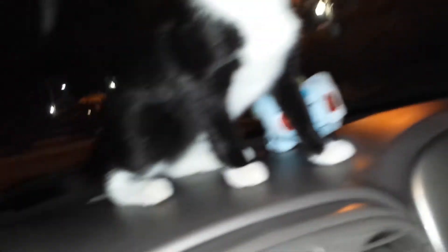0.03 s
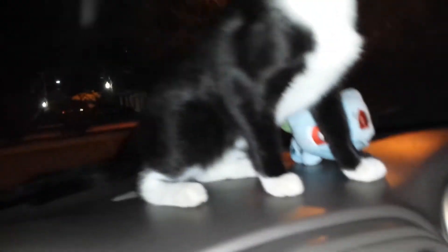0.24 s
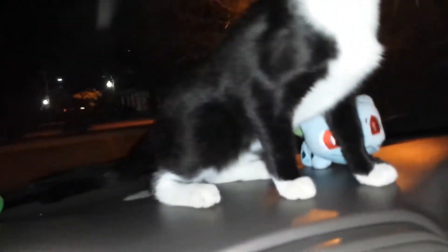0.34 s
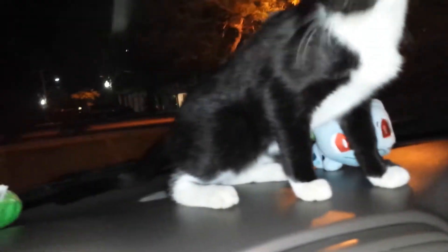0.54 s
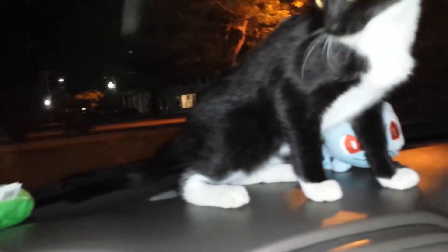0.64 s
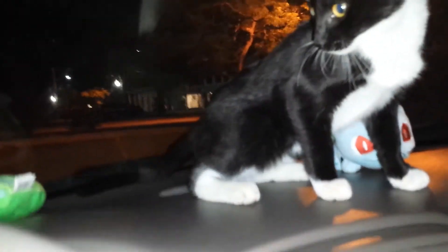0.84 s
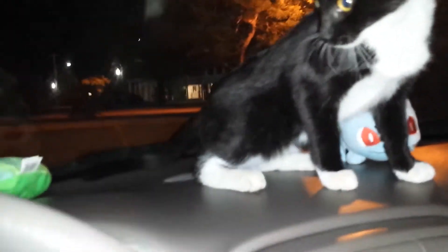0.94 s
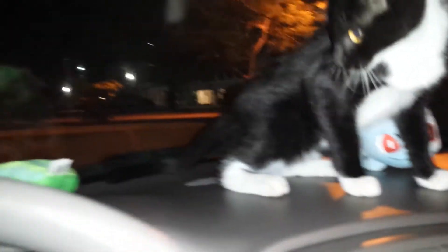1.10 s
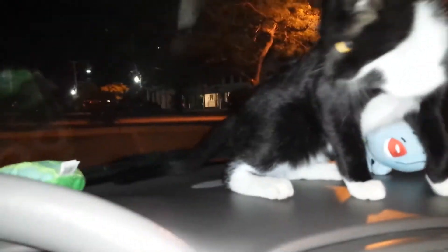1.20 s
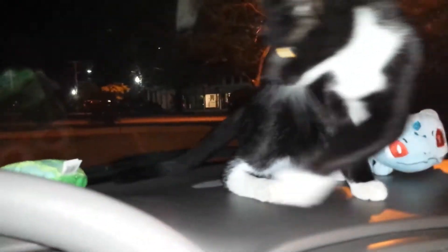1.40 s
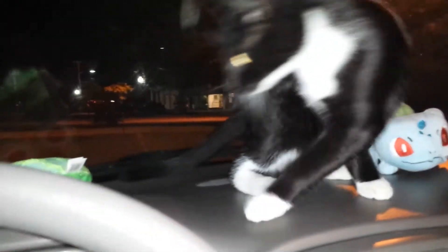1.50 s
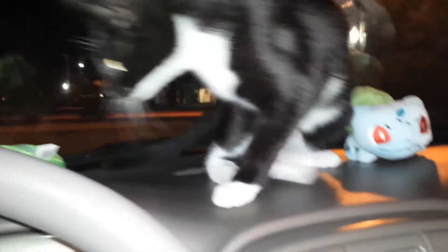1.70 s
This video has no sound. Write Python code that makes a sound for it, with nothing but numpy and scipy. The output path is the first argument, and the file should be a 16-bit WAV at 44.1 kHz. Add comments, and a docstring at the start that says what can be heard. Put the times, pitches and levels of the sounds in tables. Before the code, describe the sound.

Quick soft paw thumps and a brushing scuff on a plastic dashboard, over low cabin rumble.

```python
"""Quick soft pats, by paw or hand, on the plastic dashboard of a parked car.
From the start, low cabin rumble and microphone hiss lie under a faint rustle of fur. A brushing scuff
leads at 0.25 s into the pats, about seven a second: each slaps the plastic skin and excites the modes
of the hollow dashboard, and the cabin rings on briefly. Small ticks come just after 1 s.
The last pat lands near 1.45 s; a faint rustle, a scuff and a light touch follow."""
import sys
import numpy as np
from scipy import signal
from scipy.fft import rfft, irfft
from scipy.io import wavfile
from scipy.ndimage import uniform_filter1d

SR = 44100
rng = np.random.default_rng(int(sys.argv[2]) if len(sys.argv) > 2 else 0)


def to_wav(s):
    """Save 16-bit WAV."""
    ch = np.atleast_2d(s).T  # columns
    pcm = np.round(np.clip(ch, -1, 1) * 32767)  # PCM
    wavfile.write(sys.argv[1], SR, pcm.astype(np.int16))


N = 77175
TIME_S, FREQ_HZ = np.arange(N) / SR, np.fft.rfftfreq(N, 1 / SR)
RIGHT_LEAD_S = 0.00032  # the right microphone is nearer

def amp(db):
    """Amplitude ratio of a level in decibels."""
    return 10 ** (np.asarray(db) / 20)

def unit(x):
    """Normalisation to rms 1."""
    return x / np.sqrt(np.mean(x ** 2) + 1e-20)

def curve(points):
    """Interpolation of a spectrum over log frequency."""
    hz, db = np.transpose(points)
    return np.interp(np.log(FREQ_HZ + 1), np.log(hz + 1), db)

def pan(side_db):
    """Channel gains for a level difference, left minus right."""
    return amp(np.array([[.5], [-.5]]) * side_db)

def since(start_s):
    """Elapsed seconds, zero before the onset."""
    return np.maximum(TIME_S - start_s, 0)

def decay(t, t60_s):
    """Exponential damping: 60 dB in t60_s."""
    return np.exp(-np.log(1000) * t / t60_s)

def resonance(hz, width_hz):
    """Lorentzian peak of height 1."""
    return 1 / (1 + (2 * (FREQ_HZ - hz) / width_hz) ** 2)

def colour(x, spectrum, balance=None):
    """Spectral shaping that conserves the power of white noise."""
    gain = amp(curve(spectrum)) * (1 if balance is None else pan(curve(balance)))
    return irfft(rfft(x) * unit(gain), N)

def grit(grain, shared_power=0.15):
    """Friction noise in sub-millisecond clumps, partly coherent between the microphones."""
    clumps = unit(uniform_filter1d(rng.standard_normal(N), size=30))
    left, right, common = rng.standard_normal((3, N)) * np.exp(grain * clumps)
    coherent = np.array([np.roll(common, round(RIGHT_LEAD_S * SR)), common])
    return unit(np.sqrt(shared_power) * coherent + np.sqrt(1 - shared_power) * np.array([left, right]))

def friction(strokes):
    """Sliding friction: grainy noise under trapezoidal envelopes."""
    envelope = np.zeros(N)
    for start_s, rise_s, hold_s, release_s, level_db in strokes:
        rise = np.minimum(since(start_s) / rise_s, 1)
        release = np.maximum(1 - since(start_s + rise_s + hold_s) / release_s, 0)
        envelope += amp(level_db) * rise * release
    return grit(grain=0.15) * envelope

# Cabin noise spectrum: frequency_hz, density_db
RUMBLE_SPECTRUM = [(15, -11), (30, -41), (62, 6.5), (85, 9), (120, -1), (170, 6), (280, -8.5), (420, -14),
                   (800, -24.5), (1500, -37), (4000, -62)]
def cabin_rumble(level_db=-51):
    """Long wavelengths reach both microphones alike."""
    return amp(level_db) * colour(rng.standard_normal(N), RUMBLE_SPECTRUM)

# Self-noise spectrum: frequency_hz, density_db
HISS_SPECTRUM = [(300, 3), (1200, -2.5), (2400, -3), (4000, -1.5), (5400, 4), (6500, -1), (8500, 2),
                 (9800, -1), (12500, -1.5), (15500, -3.5), (16200, -29)]
# Self-noise balance: frequency_hz, left_minus_right_db
HISS_BALANCE = [(1000, 3.5), (3000, 0.5), (4500, 0.5), (6000, -2), (9000, -16), (15000, 0)]
def microphone_hiss(level_db=-55):
    """Broadband self-noise, uncorrelated between channels."""
    return amp(level_db) * colour(rng.standard_normal((2, N)), HISS_SPECTRUM, HISS_BALANCE)

def electronic_whine(band_db=-63, tone_db=-66, tone_hz=9230):
    """Narrowband noise beside a steady pure tone, both stronger on the right."""
    sides = pan(side_db=-10.5)
    band = irfft(rfft(rng.standard_normal((2, N))) * resonance(hz=9010, width_hz=140), N)
    tone = np.sin(2 * np.pi * tone_hz * TIME_S)
    return amp(band_db) * unit(sides * band) + amp(tone_db) * sides * tone

# Balance of sound from the dashboard: frequency_hz, left_minus_right_db
DASH_BALANCE = [(400, 5.5), (1300, 3), (2400, 3.5), (4600, 11.5), (8100, -5), (15000, -5)]
# Fur strokes: start_s, rise_s, hold_s, release_s, level_db
FUR_STROKES = [(-.02, 0.023, 0.16, 0.15, -50), (.42, 0.016, 0.15, 0.3, -57.5),
               (1.59, 0.0037, 0.003, 0.058, -49)]
# Fur friction spectrum: frequency_hz, density_db
FUR_SPECTRUM = [(300, 9), (900, 3), (1500, 4), (2600, 6.5), (4000, 1), (6500, 6.5), (10000, -6),
                (16000, -10)]
def fur_rustles():
    """Friction of fur radiates faint broadband noise."""
    return colour(friction(FUR_STROKES), FUR_SPECTRUM, DASH_BALANCE)

# Sharp clicks: centre_s, level_db, pitch_hz, half_length_s, left_minus_right_db
TICKS = [(1.0697, -22, 2270, 0.00012, 13.5), (1.0698, -38, 1010, 0.00056, 10),
         (1.081, -32, 6600, 0.00012, 17), (1.0851, -42, 3500, 0.000051, 29),
         (1.1027, -45, 3500, 0.000084, 9)]
def ticks():
    """Gaussian pulses near the left microphone: the shorter the pulse, the wider its band."""
    out = np.zeros((2, N))
    for centre_s, level_db, pitch_hz, half_length_s, side_db in TICKS:
        t = TIME_S - centre_s
        pulse = np.exp(-(t / half_length_s) ** 2) * np.cos(2 * np.pi * pitch_hz * t)
        out += pan(side_db) * amp(level_db) * pulse
    return out

# Light contacts: start_s, level_db, pitch_hz, t60_s
TOUCHES = [(1.0712, -29.5, 357, 0.022), (1.4227, -31, 258, 0.044), (1.684, -28.5, 289, 0.048)]
def light_touches(rise_s=0.003):
    """Local excitation: a light knock rings the plastic as one damped oscillator."""
    out = np.zeros(N)
    for start_s, level_db, pitch_hz, t60_s in TOUCHES:
        t = since(start_s)
        envelope = np.minimum(t / rise_s, 1) * decay(t, t60_s)
        out += amp(level_db) * envelope * np.sin(2 * np.pi * pitch_hz * t)
    return out

# Peaks and one dip of the plastic skin: centre_hz, width_hz, gain_db
SKIN_RESONANCES = [(744, 130, 1.5), (1230, 75, -6), (2223, 61, 5), (2820, 230, 5), (3765, 73, 3),
                   (5360, 53, 4), (6210, 87, 2)]
def plastic_skin(x):
    """Resonant filtering: the skin colours contact noise."""
    gain_db = sum(db * resonance(hz, width_hz) for hz, width_hz, db in SKIN_RESONANCES)
    return irfft(rfft(x) * unit(amp(gain_db)), N)

# Brushing strokes: start_s, rise_s, hold_s, release_s, level_db
SCUFF_STROKES = [(.09, .11, 0.021, 0.042, -32.5), (.29, 0.015, 0.032, 0.078, -51.5),
                 (1.415, 0.044, 0.0038, 0.046, -43.5), (1.66, 0.014, 0.037, 0.038, -47)]
# Brushing spectrum: frequency_hz, density_db
SCUFF_SPECTRUM = [(60, -47), (105, 14), (160, -4), (250, -24), (450, -9.5), (800, 0.5), (1250, -6),
                  (2200, -5.5), (3600, -8.5), (5800, 2.5), (8000, -2), (12000, -17), (16000, -35)]
def scuffs():
    """Friction on grained plastic drives the skin's resonances."""
    return plastic_skin(colour(friction(SCUFF_STROKES), SCUFF_SPECTRUM, DASH_BALANCE))

# Cabin reverberation spectrum: frequency_hz, density_db
BOOM_SPECTRUM = [(60, -30), (130, -8), (200, 0), (330, 0), (450, -6), (800, -11), (1300, -22), (3000, -50)]
def cabin_boom(contacts, gain_db=-33, rise_s=0.004, t60_s=0.095):
    """Diffuse reverberation: the tails of successive thumps add in power."""
    power = np.zeros(N)
    for start_s, thump_db, hardness, *_ in contacts:
        t = since(start_s)
        power += (amp(thump_db + hardness) * (1 - np.exp(-t / rise_s)) * decay(t, t60_s)) ** 2
    air = rng.standard_normal(N) + .3 * rng.standard_normal((2, N))  # nearly alike on both sides
    return amp(gain_db) * colour(air, BOOM_SPECTRUM) * np.sqrt(power)

# Spectrum of a slap on plastic: frequency_hz, density_db
SLAP_SPECTRUM = [(200, -2.5), (500, 12), (800, 12), (1200, 3.5), (1500, -3), (2100, 1), (3000, -2.5),
                 (4300, -0.5), (5500, 4), (8000, -3), (12000, -17), (16000, -23)]
def slaps(contacts, lead_s=0.0051, rise_s=0.0055, cabin_db=-17.5):
    """Impact noise: a gritty burst as each pat lands, with a faint reverberant tail."""
    out, grains = np.zeros((2, N)), grit(grain=0.23)
    for start_s, *_, slap_db, tilt in contacts:
        t = since(start_s - lead_s)
        rise = np.minimum(t / rise_s, 1) ** 2
        fall_s = np.maximum(t - rise_s, 0)
        fall = decay(fall_s, t60_s=0.034) + amp(cabin_db) * decay(fall_s, t60_s=0.14)
        spectrum = [(hz, db + tilt * np.log2(hz)) for hz, db in SLAP_SPECTRUM]
        out += amp(slap_db) * colour(grains * rise * fall, spectrum, DASH_BALANCE)
    return plastic_skin(out)

# Modes of dashboard and cabin: pitch_hz, level_db, t60_s, first_swing_sign
DASH_MODES = [(100.3, -16.5, 0.095, -1), (114.7, -23.5, 0.18, 1), (132.2, -23.5, 0.14, 1),
              (182.2, -33, 0.18, 1), (242.6, -40, .3, 1), (287.6, -29.5, 0.12, 1), (317.2, -42.5, 0.29, 1),
              (337.1, -21.5, 0.055, 1), (418, -29, 0.084, 1), (498.5, -32.5, 0.097, 1),
              (613.4, -39, 0.076, 1), (703, -37.5, 0.043, -1), (785.5, -35, 0.049, -1),
              (854, -40, 0.052, 1), (967, -48, 0.037, -1), (1127, -40.5, 0.048, 1), (1277, -48, 0.09, -1)]
def dashboard_thumps(contacts, pivot_hz=110, high_hz=560, spot_spread_db=4.5, build_s=0.0021):
    """Modal superposition: a harder contact is briefer and favours the high modes."""
    out, t = np.zeros((2, N)), np.arange(SR // 3) / SR
    hz, mode_db, t60_s, swing = np.array(DASH_MODES).T[:, :, None]
    high = hz > high_hz
    build = 1 - high * np.exp(-t / build_s)  # high modes grow as bending waves cross the panel
    modes = np.sign(swing) * build * decay(t, t60_s) * np.sin(2 * np.pi * hz * t)
    for start_s, thump_db, hardness, knock_db, *_ in contacts:
        spot_db = knock_db + spot_spread_db * rng.standard_normal(hz.shape)  # varies with the spot hit
        gains = amp(thump_db + mode_db + hardness * np.log2(hz / pivot_hz) + high * spot_db)
        contact_s = 0.00062 / 2 ** (hardness / 5.7)  # softness spreads the blow in time
        ring = (gains * modes).sum(0) * (1 - np.exp(-t / contact_s))
        for channel, delay_s in zip(out, (RIGHT_LEAD_S / 2, -RIGHT_LEAD_S / 2)):
            span = channel[round((start_s + delay_s) * SR):][:len(ring)]
            span += ring[:len(span)]
    return out

# Contacts of soft pats on the dashboard, up to three to a pat:
# start_s, thump_db, hardness_db_per_octave, knock_db, slap_db, slap_tilt_db_per_octave
PAT_CONTACTS = [(0.2499, -10.5, 6.5, 1.5, -20, -0.5), (0.2598, -5, 6.5, -2, -18.5, -0.5),
                (0.3989, 0, -3.8, -12, -35.5, -1), (.405, 6.5, 0.5, 6.5, -23.5, 1),
                (0.4139, -13.5, 5, -1, -25, -2.5), (.5485, -8, 5.5, 5.5, -26.5, -1),
                (.5559, 1.5, 0.7, 6.5, -25.5, -1), (0.5591, 2.5, 2, -1, -26.5, -1.5),
                (0.7077, -6, -7.5, -17, -38.5, 4), (0.844, 1, 1, 2, -27, 3), (0.9906, -0.5, 0, 4, -29, 3),
                (1.0261, -15.5, -4, -8, -70, -12), (1.1289, -3, -2.5, 8, -31, 1),
                (1.2847, -0.5, -.5, 2.5, -35.5, 1.5), (1.453, 0, 0.5, 5, -29.5, 0)]
def soft_pats():
    """Impact excitation: each contact drives the dashboard, the cabin air and the plastic skin."""
    return dashboard_thumps(PAT_CONTACTS) + cabin_boom(PAT_CONTACTS) + slaps(PAT_CONTACTS)

def scene():
    """Linear superposition of all sources, in stereo."""
    dashboard_sounds = soft_pats() + scuffs() + fur_rustles() + light_touches()
    return dashboard_sounds + ticks() + cabin_rumble() + microphone_hiss() + electronic_whine()

def record(dry, cutoff_hz=15900):
    """Band limiting by a linear-phase low-pass filter."""
    lowpass = signal.firwin(511, cutoff_hz, window=("kaiser", 9), fs=SR)
    return signal.oaconvolve(dry, lowpass[None], "same")

dry = scene()
out = record(dry)
to_wav(out)
```